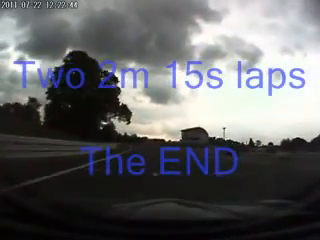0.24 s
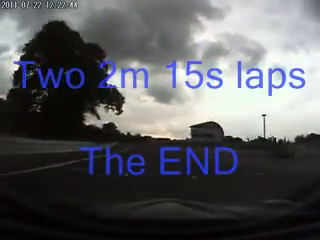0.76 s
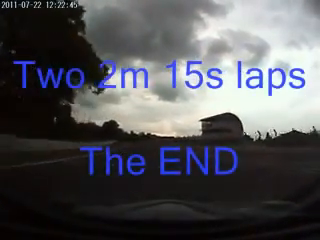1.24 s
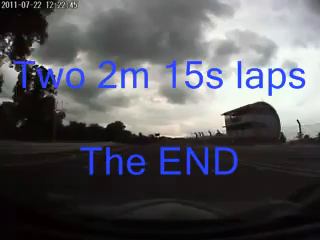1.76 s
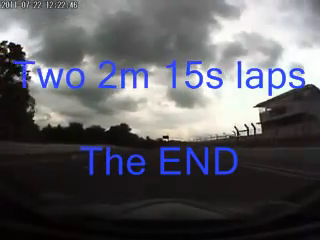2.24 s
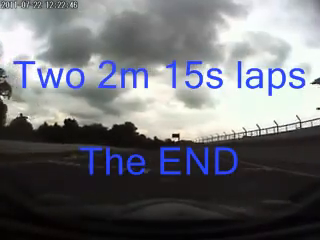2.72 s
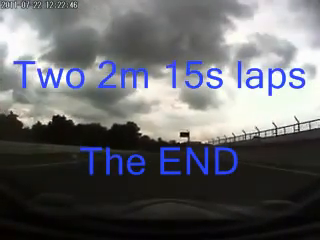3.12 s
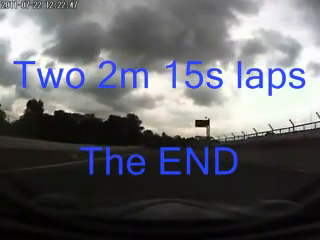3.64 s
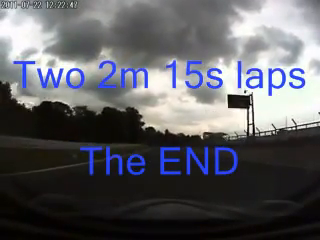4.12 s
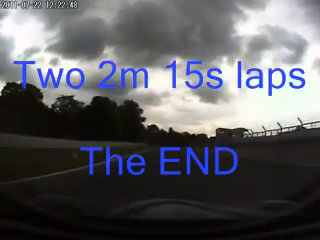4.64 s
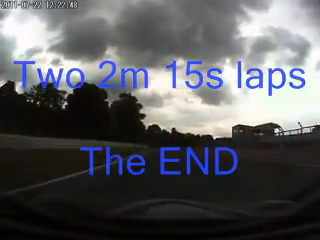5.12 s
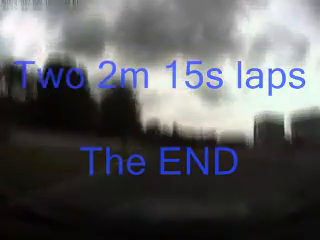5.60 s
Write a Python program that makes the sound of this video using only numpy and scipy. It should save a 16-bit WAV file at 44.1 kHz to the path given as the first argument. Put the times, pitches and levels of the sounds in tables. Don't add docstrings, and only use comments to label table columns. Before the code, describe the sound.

A coarse, distorted in-cabin pickup is swamped by throbbing driveline boom and road roar. The engine strains near its limit, goes slack during a quick gear change with a heavy thump, then catches at a lower note and climbs for four seconds. A thin electrical whine follows the revs; bumps thud, loose trim clicks, faint wind hisses, and the throttle closes at the end.

```python
import sys
import numpy as np
from scipy import signal
from scipy.fft import rfft, irfft
from scipy.io import wavfile
from scipy.ndimage import uniform_filter1d

SR = 44100
rng = np.random.default_rng(int(sys.argv[2]) if len(sys.argv) > 2 else 0)


def gain_from_db(level_db):
    decades = np.asarray(level_db, float) / 20
    return 10 ** decades


def generate_wav(sig):
    pcm = np.round(np.clip(np.atleast_2d(sig).T, -1, 1) * 32767).astype(np.int16)
    wavfile.write(sys.argv[1], SR, pcm)


N = 258426
T = np.arange(N) / SR


def curve(table, column=1):
    return np.interp(T, np.array(table)[:, 0], np.array(table)[:, column])


def burst(table):
    return gain_from_db(np.interp(T, *np.transpose(table), left=-200, right=-200))


def response(table, hz):
    table_hz, table_db = np.transpose(table)
    return gain_from_db(np.interp(np.log(hz), np.log(table_hz), table_db))


def walk(rate_hz):
    hold = int(SR / rate_hz)
    levels = np.repeat(rng.standard_normal(N // hold + 1), hold)
    return 1.39 * uniform_filter1d(uniform_filter1d(levels, hold), hold)[:N]


def band(hz, width_hz):
    f = np.arange(N // 2 + 1) * SR / N + 1e-9
    resonance = 1 / (1 + ((f - hz * hz / f) / width_hz) ** 2)
    noise = irfft(rfft(rng.standard_normal(N)) * resonance, N)
    return noise / np.std(noise)


def tone(hz):
    cycles = np.cumsum(hz * np.ones(N)) / SR + rng.random()
    return np.sqrt(2) * np.sin(2 * np.pi * cycles)


# time in seconds, level in dB.
THROTTLE = [(0, 4.5), (.5, 2.5), (1.04, 2), (1.055, -18), (1.47, -22), (1.56, 0), (3, 0), (4.5, 0.5),
            (5.73, 2), (5.76, 2), (5.86, -10.5)]


def throttle():
    return curve(THROTTLE)


# time in seconds, boom change in dB, floor thud in dB.
BUMPS = [(.11, -5, 2), (.31, -11, -3.5), (.39, 2, 0), (.64, -9.5, 1), (.71, 5, 0.5), (0.779, 2.5, 1.5),
         (.88, 3.5, 2.5), (1.04, 6.5, 1), (1.472, -10, 2), (1.522, 2.5, 3.5), (1.7, 1, 6.5), (2.23, -3, -1),
         (2.409, 5.5, 3.5), (2.45, -2.5, -0.5), (2.498, 4, 3), (2.551, -7.5, 0.5), (2.588, 5.5, 1.5),
         (2.79, -1, 3.5), (2.862, 4.5, -8), (3.121, 0, -2.5), (3.252, 2, 5.5), (3.49, 1, -12),
         (3.56, -5.5, 2.5), (3.789, 1.5, 3), (4.672, 5.5, 2.5), (4.77, -0.5, -2.5), (4.99, 0.5, 2),
         (5.12, 0.5, -2), (5.66, -2.5, -1), (5.81, 4, 2.5)]


def bumps(column):
    bump_s = 0.04
    return sum(row[column] * np.exp(-((T - row[0]) / bump_s) ** 2) for row in BUMPS)


# band centre in Hz, level in dB.
HISS = [(4000, -60), (6000, -56), (8000, -54.5), (9500, -60.5)]
# time in seconds, level in dB.
SQUEAL = [(.95, -75), (.97, -56), (1.1, -55), (1.25, -59), (1.28, -77)]
# time in seconds, level in dB.
PANEL_HUM = [(0, -57), (.45, -55), (.55, -73)]


def air():
    squeal_hz, panel_hum_hz = 7810, 3600
    hiss = sum(gain_from_db(db + 1.0 * walk(6.2)) * band(hz, hz / 4) for hz, db in HISS)
    return hiss + burst(SQUEAL) * tone(squeal_hz) + burst(PANEL_HUM) * band(panel_hum_hz, 40)


# frequency in Hz, density in dB per Hz.
ROAR = [(32, -30), (55, -7.5), (69, -6), (86, -6.5), (131, -7), (177, -27), (270, -18.5), (399, -16.5),
        (480, -23.5), (658, -18), (1030, -33.5), (1280, -35.5), (1540, -45.5), (3680, -52), (4600, -77),
        (5980, -96.5), (10100, -120)]
# centre in Hz, width in Hz, level in dB.
TYRE_RING = [(385.5, 41.5, -22.5), (127, 18.4, -24)]


def road(firing_hz):
    roar_per_thud, roar_db_per_s = 0.067, 0.2
    rasp_per_throttle, rasp_low_gear_db, shift_s = 0.15, 1.5, 1.05
    thud_db = bumps(column=2)
    roar_db = roar_per_thud * thud_db + roar_db_per_s * (T - T.mean())
    rasp_db = rasp_per_throttle * throttle() + rasp_low_gear_db * (T < shift_s)
    swell = walk(15)
    gate = 1 + 0.081 * tone(firing_hz / 2)
    out = 0
    for hz in 60 * 2 ** np.arange(0, 6.5, 1 / 3):
        level_db = thud_db if hz < 180 else roar_db if hz < 1600 else rasp_db
        flicker_db = 0.51 * swell + 0.85 * walk(8)
        noise = band(hz, hz / 3) * (gate if hz > 600 else 1)
        out = out + response(ROAR, hz) * np.sqrt(hz) * gain_from_db(level_db + flicker_db - 35.0) * noise
    for (hz, width_hz, db), level_db in zip(TYRE_RING, (roar_db, thud_db)):
        out = out + gain_from_db(db + level_db + 0.32 * walk(8.1)) * band(hz, width_hz)
    return out


# time in seconds, peak in dB, first ring in Hz, second ring in Hz, second ring in dB.
TICKS = [
    (0.834, -36.5, 6370, 9470, -4),
    (1.533, -34, 3720, 8970, -2),
    (1.893, -33.5, 4330, 4780, -3),
    (1.897, -41, 6400, 9250, -11),
    (3.019, -33.5, 6380, 4450, -7),
    (5.398, -42.5, 3800, 6350, -3),
]
# ring t60 in seconds, click level in dB.
TRIM = (0.039, -2.5)


def ticks():
    out, t = np.zeros(N + 4096), np.arange(4096) / SR
    t60_s, click_db = TRIM
    shape = np.exp(-np.log(1000) * t / t60_s) * np.minimum(t / 0.00077, 1)
    clicks = np.diff(rng.standard_normal((len(TICKS), 4097)), axis=1)
    for (s, db, low_hz, high_hz, high_db), click in zip(TICKS, clicks):
        rings = np.sin(2 * np.pi * low_hz * t) + gain_from_db(high_db) * np.sin(2 * np.pi * high_hz * t)
        out[int(s * SR):][:4096] += gain_from_db(db) * shape * (rings + gain_from_db(click_db) * click)
    return out[:N]


# time in seconds, level in dB, pitch in Hz, t60 in seconds.
BLOWS = [
    (1.2, -7.5, 19, 0.32),
    (0.85, -26, 150, .1),
]


def blows():
    out = 0
    for s, db, hz, t60_s in BLOWS:
        t = np.maximum(T - s, 0)
        swing = np.sin(2 * np.pi * hz * t * (1 - 0.8 * t))
        shape = np.exp(-np.log(1000) * t / t60_s) * np.minimum(t / 0.0083, 1)
        out = out + gain_from_db(db) * swing * shape
    return out


# time in seconds, level in dB.
HOWL = [(0, -55), (.6, -52), (.8, -44), (.9, -34), (.97, -37.5), (1.04, -41.5), (1.07, -63)]
# centre in Hz, width in Hz, level in dB.
HOWL_MODES = [(2375, 420, -2), (2850, 500, -6), (1890, 900, -4), (3580, 240, -18)]
# time in seconds, level in dB.
COAST = [(1.08, -81), (1.15, -59), (1.4, -66.5), (1.46, -86)]


def howl(firing_hz):
    air_column = sum(gain_from_db(db) * band(hz, width_hz) for hz, width_hz, db in HOWL_MODES)
    air_column = air_column * (1 + 0.45 * tone(firing_hz))
    teeth = tone(25.1 * firing_hz)
    return burst(HOWL) * air_column + burst(COAST) * teeth


# frequency in Hz, gain in dB.
WHINE_PANEL = [(7300, -37), (7600, -37), (7800, -41.5), (7930, -52.5), (8050, -43.5), (8200, -46),
               (8480, -52), (8700, -63), (9200, -43.5), (9600, -52), (9800, -54), (10000, -44.5),
               (10060, -78)]
# frequency in Hz, gain in dB.
FOLD_PANEL = [(1600, -45), (1900, -52), (2400, -46), (2750, -48), (3000, -70), (4100, -72), (4600, -55),
              (5000, -48), (5600, -45), (6100, -48), (6450, -54), (6700, -66), (6950, -59), (7150, -80)]


def whine(hz):
    sampling_hz = 22050
    folded_hz = sampling_hz - 2 * hz
    skirt = 1 + 0.074 * band(250, 600)
    main = response(WHINE_PANEL, hz) * gain_from_db(1.0 * walk(18)) * tone(hz)
    folded_gain = response(FOLD_PANEL, folded_hz) * gain_from_db(2.0 * walk(25.1) + 0.15 * throttle())
    return skirt * (main + folded_gain * tone(folded_hz))


# time in seconds, rate in Hz.
SHAFT = [(0, 36.55), (1.05, 37.99), (1.5, 38.02), (3, 40), (4.5, 42.06), (5.86, 43.21)]
# time in seconds, level in dB.
BOOM = [(0, -7), (.2, -7), (.5, -6.5), (1.0, -7.5), (1.11, -4.5), (1.2, -9.5), (1.45, -9), (1.62, -6.5),
        (2.2, -5), (3.05, -6.5), (3.4, -3), (4.1, -3), (4.7, -7), (5.2, -2), (5.6, -2.5), (5.86, -5)]


def boom():
    shaft = tone(curve(SHAFT) * (1 + 0.00679 * walk(6)))
    shudder = gain_from_db(-21.0) * band(36.7, 6.5)
    buffeting = gain_from_db(-20) * band(25.8, 5.6)
    opening_click = 0.75 * np.exp(-(T / 0.0004) ** 2)
    level_db = curve(BOOM) + bumps(column=1) - 0.52 + 0.8 * walk(12)
    return gain_from_db(level_db) * (shaft + shudder) + buffeting + opening_click


# time in seconds, pitch in Hz.
WHINE = [(0, 9765), (0.46, 9994), (0.75, 10105), (1.04, 10270), (1.1, 9981), (1.2, 9630), (1.43, 8940),
         (1.51, 8055), (1.55, 7500), (2, 7570), (2.8, 7776), (3.4, 7911), (4.1, 8092), (5, 8345),
         (5.73, 8518), (5.82, 8280), (5.85, 8255)]
# start in seconds, whine swing in Hz, decay in seconds.
WIND_UPS = [(.04, 32, .15), (1.55, -340, .085), (2.01, 14, .25), (2.41, 6, .2), (2.69, 9, .15),
            (3.05, 9, .25), (3.54, 28, .1), (3.88, 12, .15), (4.16, 15, .3), (4.65, 24, .15),
            (5.08, 11, .2), (5.42, 10, .3)]


def revs():
    wind_up_period_s = 0.19
    hz = curve(WHINE)
    for s, swing_hz, decay_s in WIND_UPS:
        t = np.maximum(T - s, 0)
        hz = hz + swing_hz * np.sin(2 * np.pi * t / wind_up_period_s) * np.exp(-t / decay_s)
    return hz


# multiple of firing rate, level in dB, share that follows the throttle (0-1).
ORDER = [(.5, -1.5, 0), (1, -2, 0.4), (1.5, -20, 0.7), (2, -5.5, 1), (2.5, -5.5, 1), (3, -3.5, 1),
         (3.5, -11.5, 1), (4, -12, 0.1), (4.5, -14.5, 0.93), (5, -12.5, 1), (5.5, -17, 0.95),
         (6, -12, 0.87), (7, -21, 0.93)]
# centre in Hz, width in Hz, gain in dB.
CABIN = [(112, 6.5, -16.5), (129.2, 17.6, -18), (202, 14.2, -17), (272.1, 13, -11.5), (415, 21, -26.5),
         (462.5, 16, -19), (561, 23.7, -18.5), (596, 47, -27.5), (688, 7.4, -16.5), (830, 134, -22.5),
         (944, 56, -25.5), (1096, 4.9, -25), (1244, 23, -24.5)]


def engine(firing_hz):
    cabin_floor_db = -39
    ports_open_s, ports_db = 3.28, -5
    out, throttle_db = 0, throttle()
    for multiple, db, share in ORDER:
        hz = multiple * firing_hz
        power = gain_from_db(2 * cabin_floor_db)
        for mode_hz, width_hz, gain_db in CABIN:
            power = power + gain_from_db(2 * gain_db) / (1 + (2 * (hz - mode_hz) / width_hz) ** 2)
        level_db = 1.0 + db + share * throttle_db + 1.0 * walk(9)
        level_db = level_db + ports_db * (multiple == 1) * (T > ports_open_s)
        out = out + np.sqrt(power) * gain_from_db(level_db) * tone(hz)
    return out


def scene():
    whine_hz = revs() * (1 + 0.0002 * walk(8))
    firing_hz = whine_hz / 37.67
    drive = boom() + engine(firing_hz) + howl(firing_hz) + whine(whine_hz) + blows()
    return (drive + road(firing_hz) + air() + ticks())[None]


def thin_treble(x):
    keep_db, patchy_db, from_hz = 4, 3.5, 4300
    f, _, z = signal.stft(x, SR, nperseg=3072)
    patches = np.kron(rng.standard_normal((len(f) // 20 + 1, z.shape[-1] // 2 + 1)), np.ones((20, 2)))
    patches = patches[:len(f), :z.shape[-1]]
    usual = uniform_filter1d(np.median(np.abs(z), axis=-1, keepdims=True), size=41, axis=-2)
    slope = np.clip((f - from_hz) / 2500, 0, 1)[:, None]
    lost = np.abs(z) < slope * usual * gain_from_db(keep_db + patchy_db * patches)
    return signal.istft(np.where(lost, 0.12 * z, z), SR, nperseg=3072)[1][..., :N]


def low_pass(x):
    return signal.sosfilt(signal.butter(12, 12600, fs=SR, output="sos"), x)


# time in seconds, level in dB.
FADE = [(0, 0), (5.3, 0), (5.86, -1.9)]


def record(dry):
    ceiling, knee, top_hz = 0.975, 37.6, 10000
    clipped = thin_treble(dry / (1 + np.abs(dry / ceiling) ** knee) ** (1 / knee))
    top = signal.ellip(8, 0.1, 33, top_hz, fs=SR, output="sos")
    settled = signal.sosfilt_zi(top)[:, None] * clipped[0, 0]
    cut = signal.sosfilt(top, clipped, zi=settled)[0]
    cut = np.clip(cut, -0.988 * ceiling, 0.988 * ceiling)
    return low_pass(cut * gain_from_db(curve(FADE)))


dry = scene()
out = record(dry)
generate_wav(out)
```